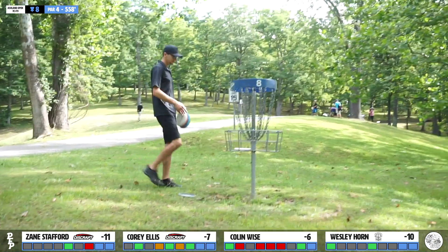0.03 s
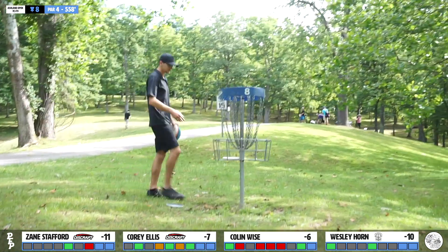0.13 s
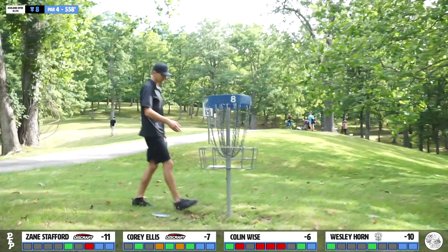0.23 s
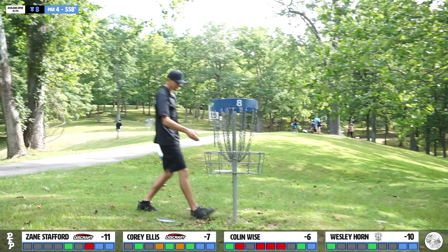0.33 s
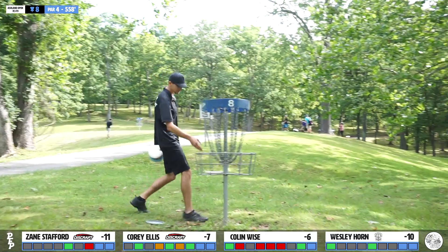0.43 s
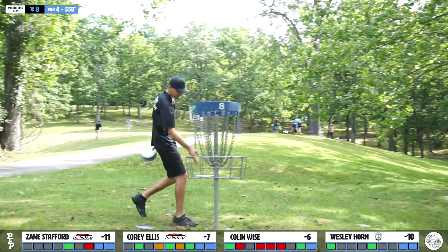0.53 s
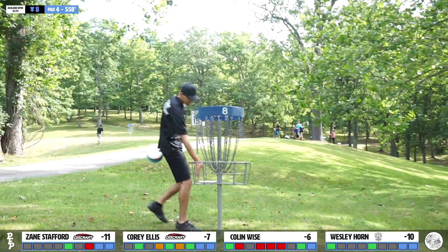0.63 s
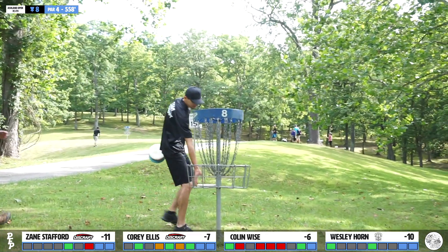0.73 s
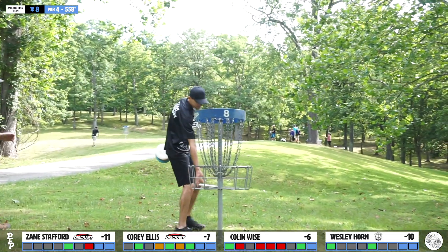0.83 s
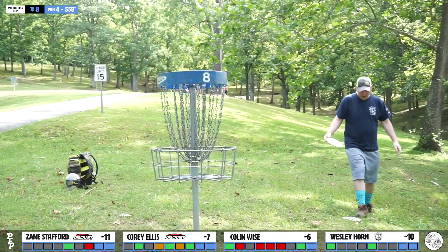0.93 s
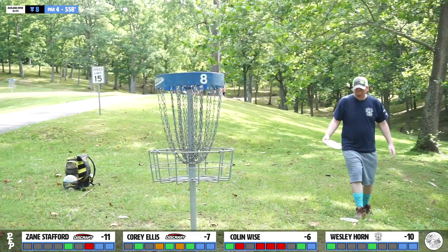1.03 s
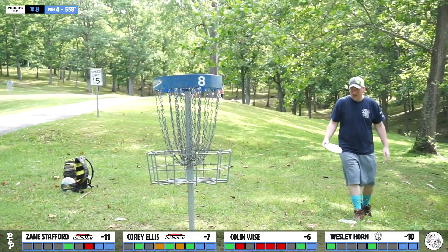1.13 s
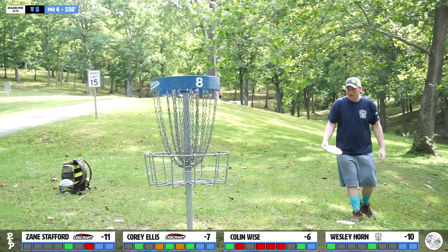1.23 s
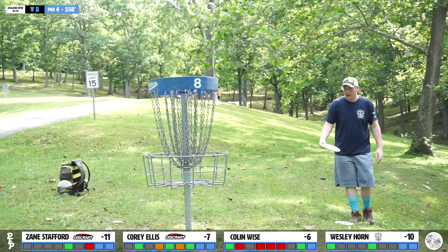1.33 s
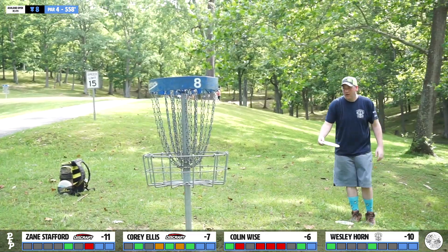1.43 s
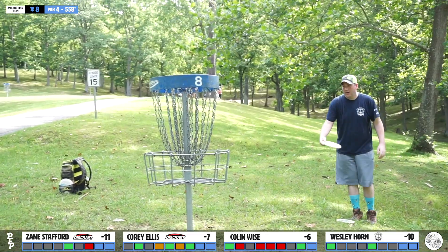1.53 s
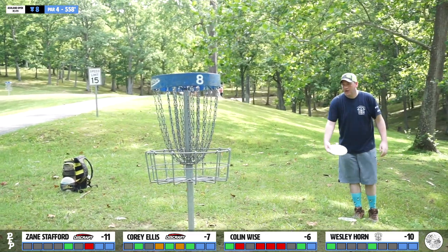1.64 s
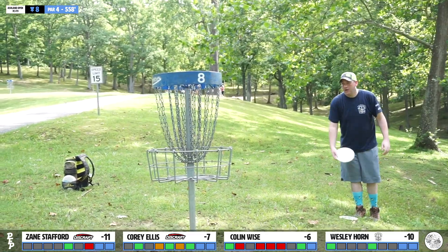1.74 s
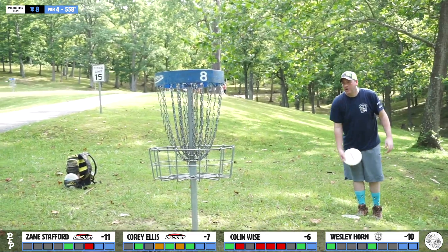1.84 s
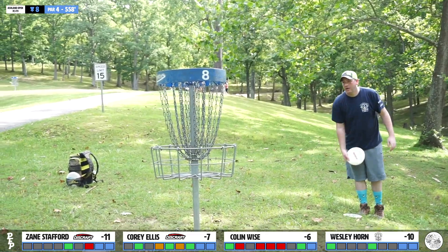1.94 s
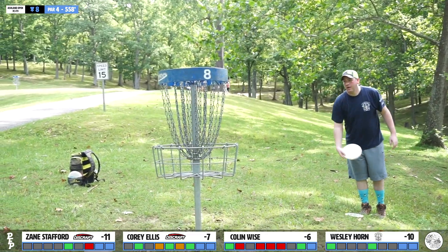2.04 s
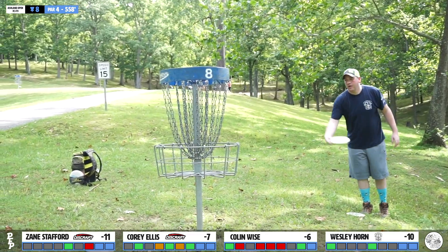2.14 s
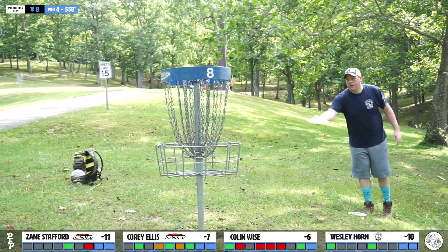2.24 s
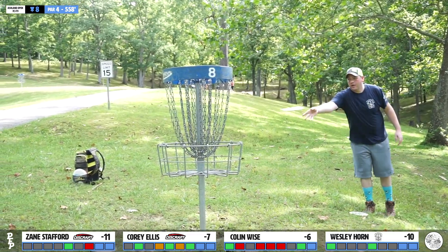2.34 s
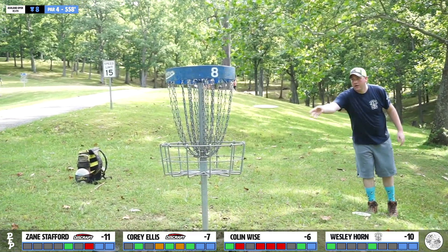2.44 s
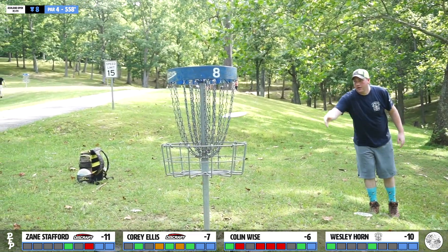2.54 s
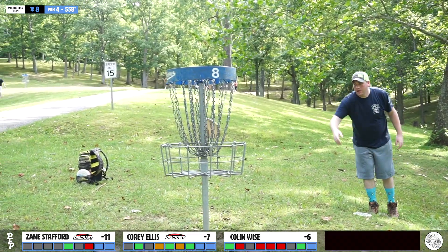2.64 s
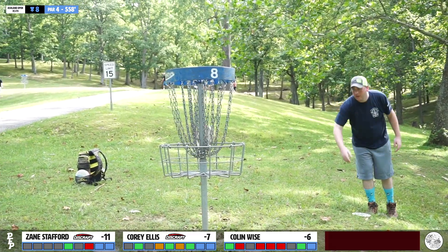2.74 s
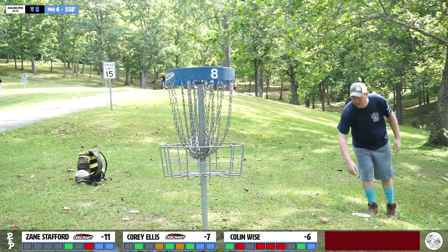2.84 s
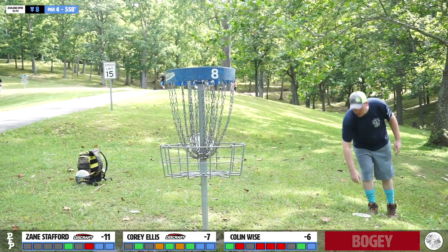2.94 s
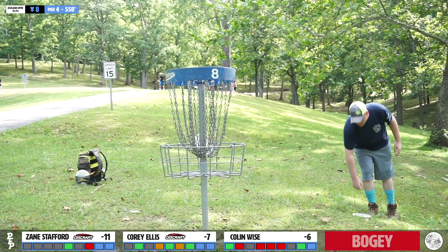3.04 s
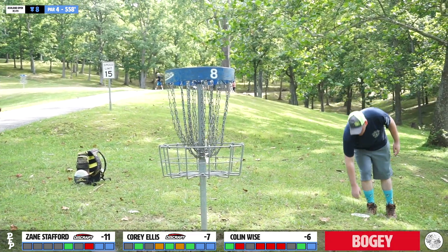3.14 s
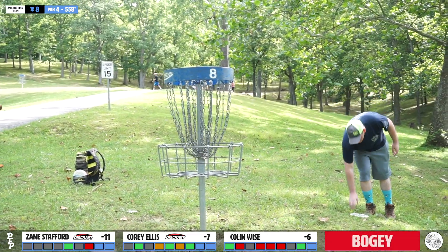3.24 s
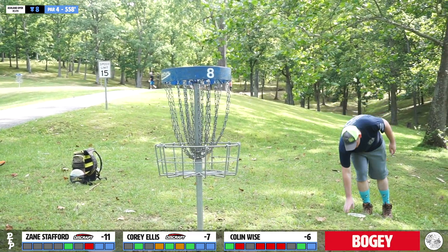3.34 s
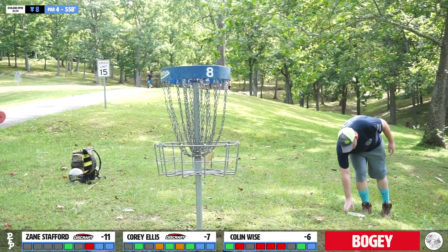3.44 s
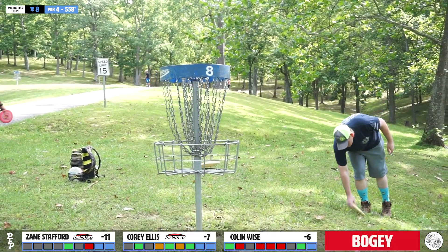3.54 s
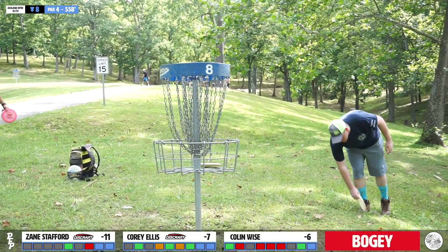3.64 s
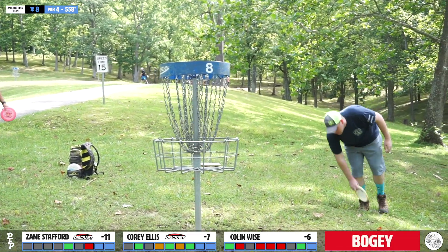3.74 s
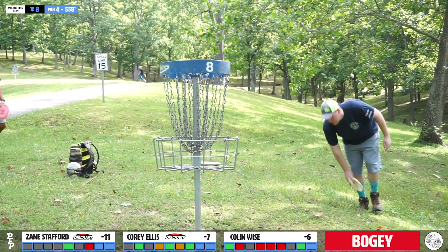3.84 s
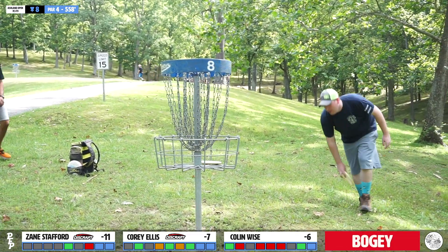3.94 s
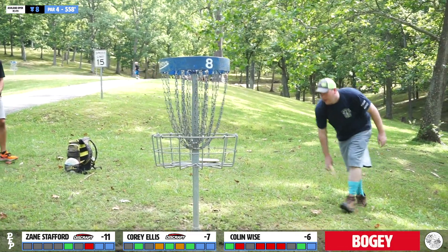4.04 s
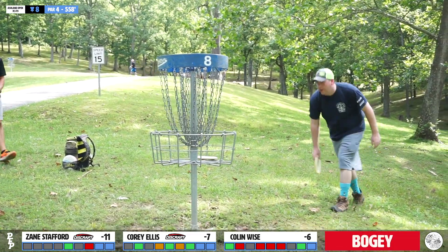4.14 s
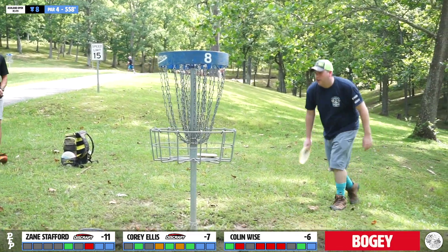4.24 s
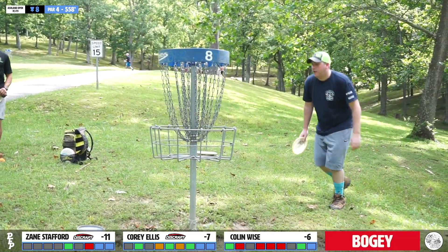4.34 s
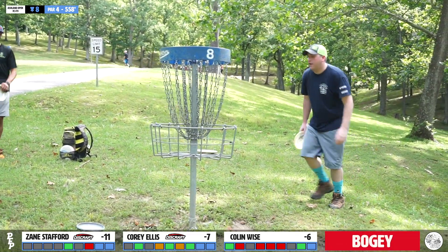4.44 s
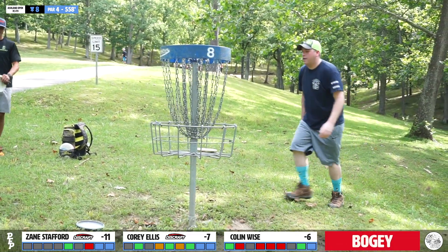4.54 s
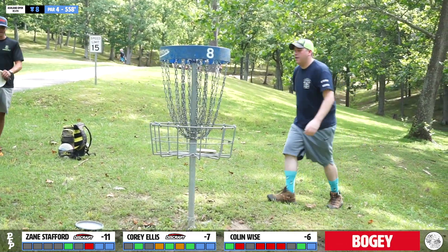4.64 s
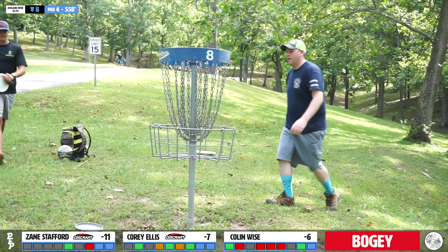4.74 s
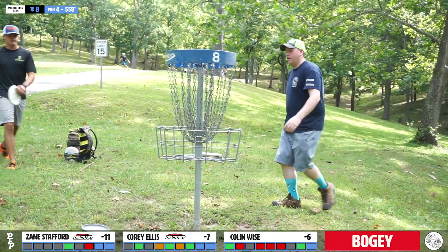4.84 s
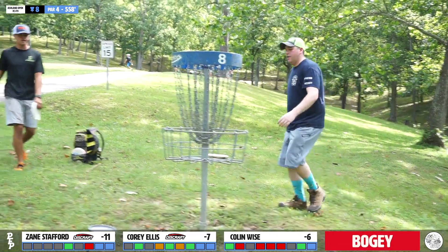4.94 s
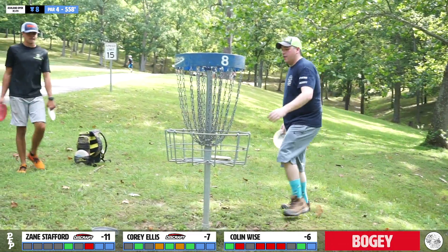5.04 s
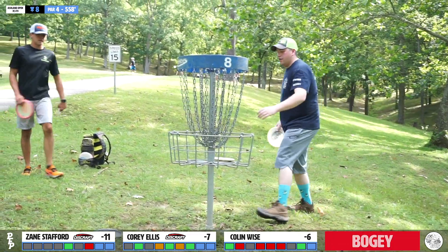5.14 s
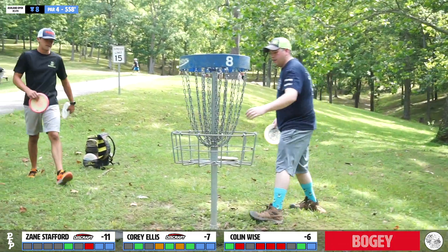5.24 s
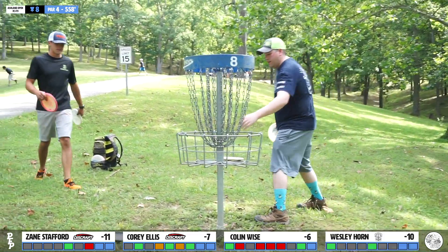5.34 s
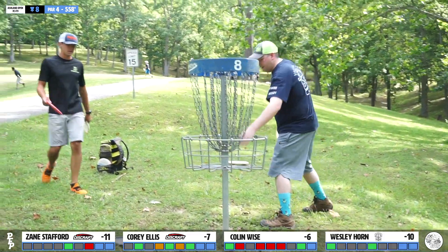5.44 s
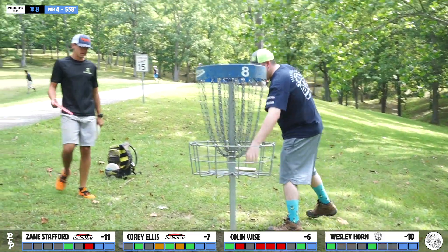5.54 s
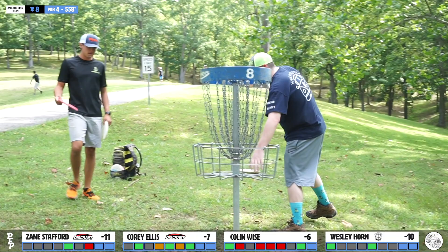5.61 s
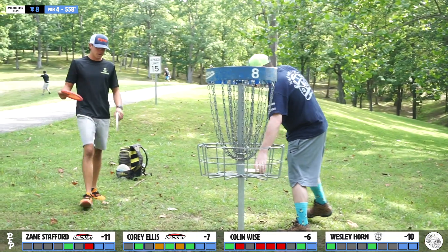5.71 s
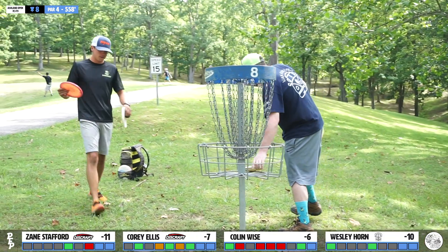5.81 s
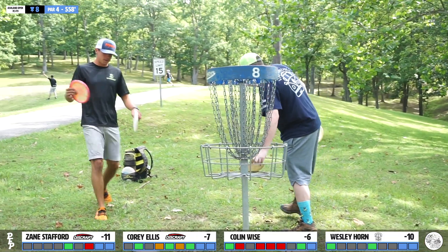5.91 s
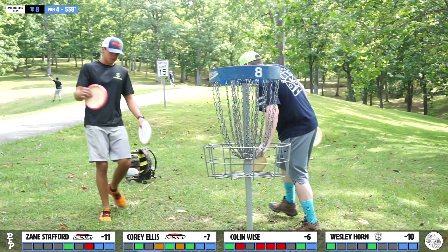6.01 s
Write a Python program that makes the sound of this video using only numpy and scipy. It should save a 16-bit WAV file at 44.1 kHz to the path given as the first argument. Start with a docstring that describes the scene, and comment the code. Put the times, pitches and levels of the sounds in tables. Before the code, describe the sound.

A faint breeze in distant leaves lies under the whole scene, a wooded park heard from a close stereo microphone. For the first two and a half seconds, soft footsteps swish and scuff through grass, slightly left, with small snaps and knocks. A songbird whistles briefly on the left at about 0.7 and 2 seconds, echoing among the trees. At about 2.7 seconds a plastic disc crashes into the chains of a steel basket straight ahead, by far the loudest sound: a bright clatter of links with a high, beating ring. The disc slides down and thuds into the humming wire cage around 3.3 and 3.7 seconds. The jingling fades, with a last small clink near 4.6 seconds. Quiet steps resume from about 4 seconds, with a tiny squeak, and the bird calls again at 4.7. Near 5.8 seconds the disc knocks lightly as it is lifted out.

```python
"""A putted disc crashes into the chains of a steel basket, slides down and drops into the wire cage.
The stereo microphone stands close by, in a wooded park. Links clink against each other, and the hoop
that gathers the chains rings on with a beat. Players walk over the grass nearby, a songbird whistles
off to the left among echoing trees, and a faint breeze in far leaves lies under it all."""
import sys
import numpy as np
from scipy import signal
from scipy.fft import rfft, irfft
from scipy.io import wavfile
from scipy.ndimage import uniform_filter1d

SR = 44100
rng = np.random.default_rng(int(sys.argv[2]) if len(sys.argv) > 2 else 0)


def generate_wav(signal):
    """Clip the signal to [-1, 1] and save it as 16-bit WAV at the path in sys.argv[1]."""
    frames = np.transpose(np.atleast_2d(signal))
    scaled = np.clip(frames, -1, 1) * 32767
    pcm = np.round(scaled).astype(np.int16)
    wavfile.write(sys.argv[1], SR, pcm)


N = 267687
T = np.arange(N) / SR
DRAUGHT_STOP_S = .972  # the steady draught and the first bird's echo stop short here

# Levels in the tables are relative; each source sets its own gain.
# spectrum of far leaves: frequency_hz, level_db
LEAF_SPECTRUM = [(18, -71), (30, -31), (98, -12.5), (153, -15.5), (280, -6), (889, -0.5), (988, -5),
                 (1320, -2), (1910, -7.5), (2750, -5.5), (6380, -10), (12600, -8), (16000, -15)]
# gusts on the microphone: peak_s, length_s, level_db
GUSTS = [(.24, 0.052, -82), (0.386, 0.059, -81), (0.65, 0.11, -77), (0.86, 0.078, -72.5)]
# the bird's dipping phrase: offset_s, pitch_hz, effort_db
DIP_PHRASE = [(0, 3900, -13), (.03, 3250, -13.5), (.06, 2950, -1.5), (.087, 2850, -7.5), (.11, 2400, -5.5),
              (.135, 2200, -9.5), (.17, 2650, -4.5), (.198, 3600, -1), (.215, 2800, -6), (.235, 2450, -7.5),
              (.275, 2950, 0.5), (.32, 3050, -19)]
# its arching phrase: offset_s, pitch_hz, effort_db
ARCH_PHRASE = [(0, 3300, -14.5), (0.016, 4890, -26), (.035, 3118, -12), (0.076, 3267, -4), (.10, 3330, 0),
               (.135, 3048, -2), (.167, 3700, -2), (.183, 4150, -6), (.225, 3120, -2.5), (0.301, 2540, -12)]
# calls from the trees: start_s, phrase, length_s, level_db, direct_db (straight through the leaves)
BIRD_CALLS = [(.715, DIP_PHRASE, .25, -53.5, -2), (1.156, DIP_PHRASE, 0.11, -64.5, -11),
              (2.02, ARCH_PHRASE, 0.31, -54.5, -2), (4.70, DIP_PHRASE, 0.29, -56, -7.5)]
# close, dry squeaks: peak_s, length_s, pitch_hz, glide_hz_per_s, level_db
SQUEAKS = [(3.465, 0.033, 3400, -3, -64.5), (4.219, 0.014, 4730, -12000, -65),
           (4.238, 0.017, 3870, -6000, -54.5), (4.264, 0.042, 3620, -1000, -69.5)]
# strides and shuffles in the grass: peak_s, length_s, swish_db, scuff_db
STRIDES = [(0.139, 0.18, -53, -61), (0.223, 0.14, -65, -58.5), (0.418, 0.3, -65, -66.5),
           (0.629, 0.054, -56, -66), (0.745, .2, -59.5, -63.5), (0.834, 0.29, -77, -63.5),
           (1.045, 0.51, -75, -67.5), (1.44, 0.17, -68, -89), (1.604, 0.48, -77, -75),
           (1.929, 0.085, -64, -71), (2.13, 0.12, -66, -76), (2.462, 0.24, -71, -86),
           (4.125, 0.27, -93, -70.5), (4.21, 0.063, -63, -68), (4.695, 0.084, -58.5, -75.5),
           (5.09, 0.32, -77.5, -67), (5.28, 0.47, -69.5, -72), (5.62, 0.24, -96, -69),
           (5.767, 0.31, -85, -68), (5.962, 0.074, -73, -67)]
# spectrum of flicking grass blades: frequency_hz, level_db
SWISH_SPECTRUM = [(1180, -26), (2000, -8.5), (5350, -9), (5630, -8), (7510, -4.5), (10400, -2), (14900, -4),
                  (16000, -15)]
# spectrum of rubbing soles and clothes: frequency_hz, level_db
SCUFF_SPECTRUM = [(71, -33), (120, -17), (167, -12.5), (352, -1), (431, -3.5), (805, 0.5), (1050, -1.5),
                  (1150, -2), (1650, -1.5), (1840, -7.5), (1990, -3), (5000, -11), (6500, -49),
                  (11000, -120)]
# twigs, footfalls and handled discs: start_s, knock_db, snap_db
TICKS = [(.195, -46.5, -60), (0.283, -60, -53.5), (0.407, -57.5, -51.5), (.603, -75, -46), (.634, -51, -57),
         (.815, -46.5, -66), (.827, -50.5, -69), (1.044, -51, -66), (1.069, -79, -43.5), (1.256, -57, -82),
         (1.59, -70, -59.5), (1.769, -79, -59.5), (2.226, -62.5, -61.5), (4.05, -61.5, -83),
         (4.099, -62, -67), (5.154, -60, -63), (5.505, -75, -57), (6.012, -67, -57.5)]
# modes of the wire cage: pitch_hz, level_db, t60_s
CAGE_MODES = [(281, -9, 1), (396.2, -4, 0.53), (846, 8, 0.088), (1170, -2.5, 0.83), (1220, 0, 0.97),
              (1286, -3, 1), (1326, -1, .9), (1635, 0, 0.55), (1776, -2, 0.78), (1725, 2.5, 0.77),
              (2120, 0, 0.45), (2277, 1.5, 0.94), (2726, -5, 1), (2850, 1, 0.5), (2930, -0.5, 0.94),
              (3700, -1.5, 0.34), (4940, -15, 0.36)]
# crowd of weak modes in its loose wires: frequency_hz, level_db
WIRE_SPECTRUM = [(250, 4), (420, 10), (550, -14), (800, -9), (980, -23), (1220, 15), (1480, 8), (1730, 20),
                 (2100, 13.5), (2850, 18), (3230, -18), (3600, 4), (6000, -49)]
# blows on the cage: start_s, level_db
CAGE_HITS = [(2.768, -52), (3.277, -47.5), (3.652, -48), (3.70, -52.5), (3.774, -55), (4.551, -60.5),
             (5.72, -64)]
# modes of the plastic disc: pitch_hz, width_hz, level_db
DISC_MODES = [(416, 54, -15), (808, 137, 2.5), (1124, 310, 0.5), (1310, 21, 1.5), (1767, 150, 2),
              (2294, 190, -2.5)]
# the disc knocks on chains and pole: start_s, level_db
DISC_KNOCKS = [(2.66, -46.5), (2.682, -44.5), (2.704, -46), (2.731, -40.5), (2.742, -45.5), (2.749, -39),
               (2.768, -41.5), (2.787, -46), (2.807, -44), (2.833, -53), (2.861, -48.5), (2.946, -50.5),
               (2.978, -48), (3.776, -52), (5.85, -54.5), (5.949, -58)]
# modes of the steel hoop, with two close pairs: pitch_hz, level_db, t60_s
HOOP_MODES = [(4497, 0, 1.0), (4530, 0, .7), (4725, -21, .4), (12478, -7, .9), (12516, -7, .8)]
# blows on the hoop: start_s, ring_db, buzz_db, buzz_hz
HOOP_HITS = [(1.07, -73, -62.5, 4560), (2.72, -47.5, -46, 4670), (2.812, -26.5, -36.5, 4600),
             (3.124, -87, -47, 5200), (3.219, -49.5, -47, 4720), (3.838, -54.5, -50, 4680)]
# modes of a chain link: pitch_hz, spread_hz (among links), level_db, t60_s
LINK_MODES = [(4762, 70, -16, 0.086), (9594, 170, -6.5, 0.063), (11874, 113.5, 5, 0.097),
              (12700, 170, -4.5, 0.21), (13380, 63, -3, 0.062), (13400, 230, -18, .035),
              (15280, 180, -7.5, 0.065)]
# spectrum of steel contact: frequency_hz, level_db
CLATTER_SPECTRUM = [(600, -15), (1500, -5), (3000, 0), (5500, 3.5), (7500, 2.5), (11000, 4), (16000, 4.5)]
# whole strands slap together: start_s, ring_db, clatter_db
STRAND_SLAPS = [(2.6575, -27.5, -32.5), (2.7085, -26, -38.5), (2.798, -25, -40), (2.841, -39, -42),
                (2.8913, -39, -43.5), (2.9576, -28, -45), (2.9841, -29.5, -59), (3.05, -27, -56),
                (3.096, -33, -52), (3.1154, -22, -53), (3.127, -33, -44.5), (3.2192, -28.5, -46.5),
                (3.266, -31, -48), (3.2837, -32, -53), (3.3927, -51, -74), (3.466, -37.5, -72),
                (3.5019, -38, -80), (3.632, -42.5, -60), (3.7046, -36, -55), (3.7957, -39.5, -73),
                (3.834, -42, -50.5), (4.119, -53.5, -64), (4.506, -52.5, -85), (4.5506, -41.5, -55)]
# pushes that set the chains swinging: start_s, length_s, ring_db, clatter_db, settle_db_per_s
CHAIN_PUSHES = [(2.659, .19, -30.5, -38.5, 74), (3.12, .16, -47.5, -49.5, 44), (3.70, .17, -48, -79, 115.5),
                (4.551, .135, -52, -71.5, 300)]


def undb(db):
    """Decibels to gain."""
    return 10 ** (np.asarray(db) / 20)


def unit(x):
    """Scale to rms 1."""
    return x / np.sqrt(np.mean(x ** 2))


def crest(x):
    """Scale to peak 1."""
    return x / np.abs(x).max()


def fade(t60, size):
    """Exponential decay over size samples."""
    return np.exp(-np.log(1000) * T[:size] / t60)


def swell(peak_s, length_s, rise_share=0.54):
    """A movement that builds to a rounded peak and dies away."""
    away = (T - peak_s) / (length_s * np.where(T < peak_s, rise_share, 1 - rise_share))
    return np.exp(2 * (1 - np.hypot(1, away)))


def drift(rate_hz):
    """A random wander with a spread near 1."""
    knots = rng.standard_normal(4096)
    return np.interp(T * rate_hz, np.arange(len(knots)), knots)


def crackle(grain_db, size):
    """Two noises whose strength jumps together about every millisecond."""
    grains = np.repeat(undb(grain_db * rng.standard_normal(size // 40 + 1)), 40)[:size]
    return unit(rng.standard_normal((2, size)) * grains)


def colour(x, spectrum):
    """Filter by a spectrum, falling away under its lowest point."""
    hz, db = np.transpose(spectrum)
    f = np.maximum(np.fft.rfftfreq(x.shape[-1], 1 / SR), 1)
    gain = undb(np.interp(np.log(f), np.log(hz), db)) * np.minimum(f / hz[0], 1) ** 2
    return irfft(rfft(x) * gain, x.shape[-1])


def add(track, start_s, sound):
    """Mix a sound into a track."""
    part = track[..., int(start_s * SR):][..., :sound.shape[-1]]
    part += sound[..., :part.shape[-1]]


def place(pair, pan_db, width):
    """Mid and side to the left and right capsules; positive pan is to the left."""
    mid, side = pair
    return np.array([(mid + width * side) * undb(pan_db / 2), (mid - width * side) * undb(-pan_db / 2)])


def from_left(pair, lag_samples=4):
    """Sound from the left reaches the right capsule late."""
    return np.array([pair[0], np.roll(pair[1], lag_samples)])


def woods(x, t60, build_s):
    """Trunks all round scatter a sound into a tail that builds up and dies away."""
    tail = rng.standard_normal((2, SR)) * fade(t60, SR) * (1 - np.exp(-T[:SR] / build_s))
    tail /= np.sqrt(np.sum(tail ** 2, axis=1, keepdims=True))
    return signal.fftconvolve(x[None], tail, axes=1)[:, :N]


def breeze(leaves_db=-71, draught_db=-89.5):
    """Far leaves murmur; a little wind bumps the microphone, its steady draught stopping early."""
    leaves = unit(colour(rng.standard_normal((2, N)), LEAF_SPECTRUM)) * undb(0.47 * drift(2.62))
    # long waves reach both capsules alike, so the side signal has little bass
    leaves[1] = colour(leaves[1], [(30, -16), (150, -7), (1000, -2.5), (4000, 0)])
    leaves = place(leaves, pan_db=1, width=0.98) * undb(leaves_db)
    gusts = sum(swell(s, length) * undb(db) for s, length, db in GUSTS)
    wind = gusts + undb(draught_db) * (T < DRAUGHT_STOP_S)
    rumble = colour(rng.standard_normal((2, N)), [(35, -15), (65, 0), (110, -1.5), (220, -12), (900, -62)])
    bumps = unit(rumble) * wind * undb(3.3 * drift(24.9))
    return from_left(leaves + place(bumps, pan_db=0, width=0.35))


def whistle(hz, waver=0.0198, flutter_db=3, overtone=0):
    """A gliding, nearly pure tone with a slight tremble."""
    pitch = uniform_filter1d(hz, size=300) * (1 + waver * drift(300))
    phase = 2 * np.pi * np.cumsum(pitch) / SR
    return np.sqrt(2) * (np.sin(phase) + overtone * np.sin(2 * phase)) * undb(flutter_db * drift(90))


def songbird(echo_db=-0.5):
    """A bird whistles off to the left, trailed by the echo of the wood."""
    out = np.zeros((2, N))
    for s, phrase, length, db, direct_db in BIRD_CALLS:
        offset_s, hz, effort_db = np.transpose(phrase)
        age = T - s
        effort = undb(np.interp(age, offset_s, effort_db)) * (age > 0) * (age < length)
        song = whistle(np.interp(age, offset_s, hz)) * effort
        direct = place([song, np.imag(signal.hilbert(song))], pan_db=11.5, width=0.45)
        echo = place(woods(song, t60=1.27, build_s=0.0021), pan_db=1, width=0.69)
        same_part = (T < DRAUGHT_STOP_S) == (s < DRAUGHT_STOP_S)  # a call begun before that moment stops there, echo and all
        out += (direct * undb(direct_db) + echo * undb(echo_db)) * undb(db) * same_part
    return out


def squeaks():
    """Brief raspy chips, too close to the microphone to echo."""
    chips = np.zeros(N)
    for s, length, hz, glide, db in SQUEAKS:
        pitch = hz + glide * np.clip(T - s, -length, length)
        chips += whistle(pitch, waver=.045, overtone=0.4) * swell(s, length) * undb(db)
    return place([chips, 0], pan_db=2, width=0)


def steps(swish_db=2, scuff_db=-0.5, uneven_db=1.5):
    """Left of centre, grass flicks against shoes while soles and clothes rub; all pause for the putt."""
    swish, scuff = np.zeros((2, N))
    for s, length, blades_db, sole_db in STRIDES:
        stride = swell(s, length)
        swish = np.hypot(swish, stride * undb(blades_db))
        scuff = np.hypot(scuff, stride * undb(sole_db))
    blades = unit(colour(crackle(grain_db=3, size=N), SWISH_SPECTRUM)) * swish * undb(swish_db)
    turf = unit(colour(crackle(grain_db=2.5, size=N), SCUFF_SPECTRUM)) * scuff * undb(scuff_db)
    turf *= undb(uneven_db * drift(45))
    return place(blades, pan_db=3.5, width=1) + from_left(place(turf, pan_db=4, width=0.47))


def knock(contact_t60, size=3000):
    """A short rough push rings the damped modes of plastic."""
    push = rng.standard_normal((2, size)) * fade(contact_t60, size)
    body = sum(undb(db) * signal.lfilter(*signal.iirpeak(hz, hz / width, fs=SR), push)
               for hz, width, db in DISC_MODES)
    body = signal.sosfilt(signal.butter(3, [340, 3800], "band", fs=SR, output="sos"), body)
    return body / np.abs(body).max(axis=1, keepdims=True)


def ticks(knock_db=5, snap_db=2, snap_t60=0.039, size=3000):
    """Twigs, footfalls and handled discs knock and snap round the players, near the microphone."""
    out = np.zeros((2, N))
    for s, dull_db, bright_db in TICKS:
        add(out, s, knock(contact_t60=0.023) * undb(dull_db + knock_db))
        snap = unit(colour(rng.standard_normal((2, size)), CLATTER_SPECTRUM)) * fade(snap_t60, size)
        add(out, s, snap * undb(bright_db + snap_db))
    return place(out, pan_db=2, width=0.63)


def cage(thud_db=-5, scatter_db=2, rattle_db=-16, rattle_t60=1.0, push_s=0.0037):
    """Straight ahead the disc lands in the cage: a thud, the welded frame hums and its wires rattle."""
    out = np.zeros((2, N))
    hz, db, t60 = np.transpose(CAGE_MODES)[:, :, None]
    modes = np.sin(2 * np.pi * hz * T[:SR]) * fade(t60, SR) * undb(db)
    push = 1 - np.exp(-T[:SR] / push_s)  # the hum and rattle swell in over a few milliseconds
    for s, blow_db in CAGE_HITS:
        signs = rng.choice([-1, 1], (2, len(modes)))
        shares = signs * undb(scatter_db * rng.standard_normal(signs.shape))
        hum = crest(shares @ modes)
        wires = unit(colour(crackle(grain_db=3.5, size=SR), WIRE_SPECTRUM))
        rattle = wires * fade(rattle_t60, SR) * undb(rattle_db)
        thud = knock(contact_t60=0.095, size=SR) * undb(thud_db)
        add(out, s, ((hum + rattle) * push + thud) * undb(blow_db))
    return place(out, pan_db=0, width=0.049)


def disc(knock_db=3):
    """The plastic disc knocks between chains and pole, drops, and is later lifted out."""
    out = np.zeros((2, N))
    for s, db in DISC_KNOCKS:
        add(out, s, knock(contact_t60=.028) * undb(db + knock_db))
    return place(out, pan_db=-1.5, width=0.036)


def hoop(buzz_t60=0.19, buzz_width_hz=260, build_s=0.016, size=9000):
    """Close modes start against each other, so the hoop swells and beats; the striking link buzzes."""
    out = np.zeros(N)
    age = T[:2 * SR]
    modes = sum((-1) ** k * undb(db) * np.sin(2 * np.pi * hz * age) * fade(t60, len(age))
                for k, (hz, db, t60) in enumerate(HOOP_MODES))
    ring = crest(modes * (1 - np.exp(-age / build_s)))
    for s, ring_db, buzz_db, buzz_hz in HOOP_HITS:
        add(out, s, ring * undb(ring_db))
        edges_hz = [buzz_hz - buzz_width_hz / 2, buzz_hz + buzz_width_hz / 2]
        band = signal.butter(2, edges_hz, "band", fs=SR, output="sos")
        buzz = unit(signal.sosfilt(band, rng.standard_normal(size))) * fade(buzz_t60, size)
        add(out, s, buzz * undb(buzz_db))
    # the tone reaches the two capsules a little out of step
    return place([out, np.imag(signal.hilbert(out))], pan_db=3, width=0.41)


def clink(scatter_db=4, tick_db=-15, tick_t60=0.0037, pan_spread=0.44, size=5000):
    """One link is struck: a tick, then its own pitches and mix of modes, from its own place."""
    hz, spread, db, t60 = np.transpose(LINK_MODES)[:, :, None]
    detune, strength, turn = rng.standard_normal((3, len(LINK_MODES), 1))
    modes = np.sin(2 * np.pi * (hz + spread * detune) * T[:size] + np.pi * turn)
    ring = crest(np.sum(undb(db + scatter_db * strength) * modes * fade(t60, size), axis=0))
    tick = np.diff(rng.standard_normal(size + 1)) / 2 * fade(tick_t60, size)
    mid = ring + tick * undb(tick_db)
    return np.array([mid, mid * pan_spread * rng.standard_normal()])


def slaps(ring_db=-1, clatter_t60=0.19, bunch_s=.004, rebound_s=.03, rebound_db=-10, size=9000):
    """A strand lands: a few links within milliseconds, softer rebounds, and a burst of contact noise."""
    out = np.zeros((2, N))
    for s, link_db, contact_db in STRAND_SLAPS:
        bunch = np.zeros((2, size))
        for lag in (0, *rng.random(2) * bunch_s):
            add(bunch, lag, clink())
        for lag in rng.random(3) * rebound_s:
            add(bunch, lag, clink() * undb(rebound_db))
        add(out, s, crest(bunch) * undb(link_db + ring_db))
        burst = unit(colour(crackle(grain_db=5, size=size), CLATTER_SPECTRUM)) * fade(clatter_t60, size)
        burst[1] *= .3  # less side signal keeps it near the centre
        add(out, s, burst * undb(contact_db))
    return place(out, pan_db=1.5, width=0.67)


def chain_swing(rise_s=.012, clatter_fall_db_per_s=65):
    """Links ring while a push lasts and then settle; the hard clatter falls from its first moment."""
    swing, clatter = np.zeros((2, N))
    for s, length, ring_db, clatter_db, settle in CHAIN_PUSHES:
        age = np.maximum(T - s, 0)
        rise = 1 - np.exp(-age / rise_s)
        swing += rise * undb(ring_db - settle * np.maximum(age - length, 0))
        clatter += rise * undb(clatter_db - clatter_fall_db_per_s * age)
    return swing, clatter


def chains(ring_db=-3, clatter_db=-1.5, force_spread_db=5, crowding=0.48, count=380):
    """Close to the microphone, links collide: harder and more often the wider the strands swing."""
    swing, clatter = chain_swing()
    collisions = np.cumsum(swing ** crowding)
    times = np.interp((np.arange(count) + rng.random(count)) / count, collisions / collisions[-1], T)
    links = np.zeros((2, N))
    for s, force in zip(times, rng.standard_normal(count)):
        add(links, s, clink() * undb(force_spread_db * force))
    # the links share out the energy of the swing
    running_rms = np.sqrt(np.abs(uniform_filter1d(links[0] ** 2, size=1800)) + 1e-4)
    links *= swing / running_rms * undb(ring_db)
    contacts = unit(colour(crackle(grain_db=5, size=N), CLATTER_SPECTRUM)) * clatter * undb(clatter_db)
    return place(links, pan_db=1, width=0.63) + place(contacts, pan_db=-2, width=.25)


def scene(echo_db=-22, low_cut_hz=300):
    """The basket and the players close by, the wood behind them."""
    crash = chains() + slaps() + hoop() + disc()
    # small links and thin plastic radiate no bass
    crash = signal.sosfilt(signal.butter(4, low_cut_hz, "high", fs=SR, output="sos"), crash)
    near = crash + cage() + ticks()
    echo = undb(echo_db) * woods(near.mean(axis=0), t60=0.45, build_s=0.0079)
    return near + echo + steps() + songbird() + squeaks() + breeze()


def record(dry):
    """The recorder cuts the top steeply at 15.8 kHz."""
    return signal.sosfilt(signal.ellip(10, .2, 70, 15800, fs=SR, output="sos"), dry)


dry = scene()
out = record(dry)
generate_wav(out)
```